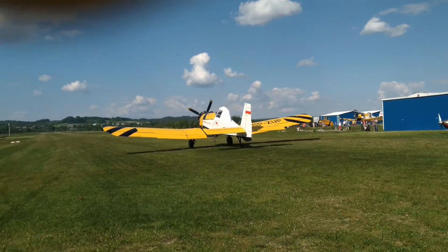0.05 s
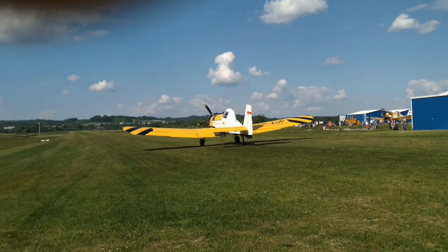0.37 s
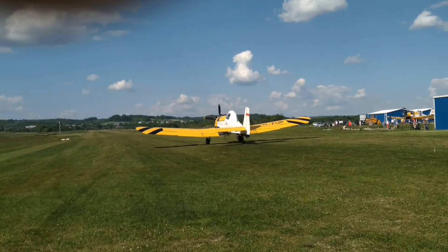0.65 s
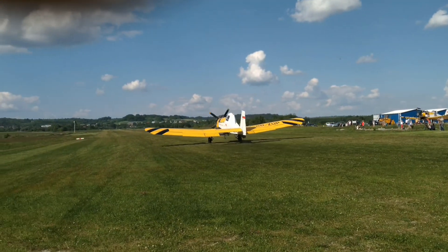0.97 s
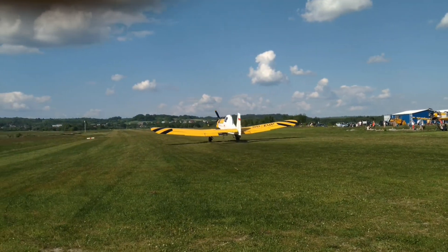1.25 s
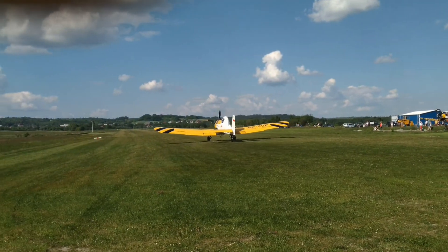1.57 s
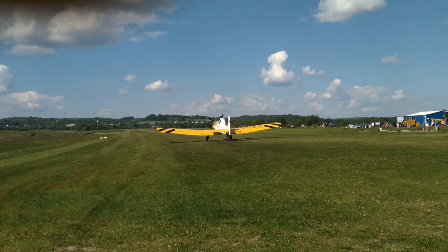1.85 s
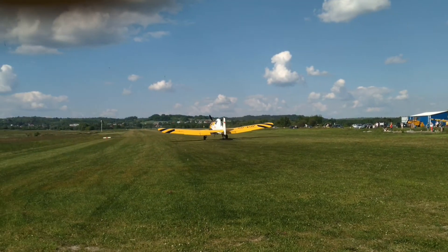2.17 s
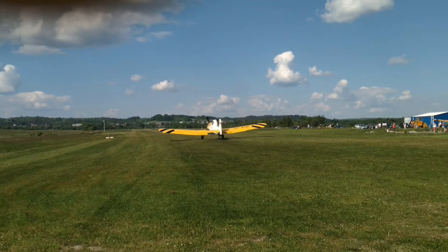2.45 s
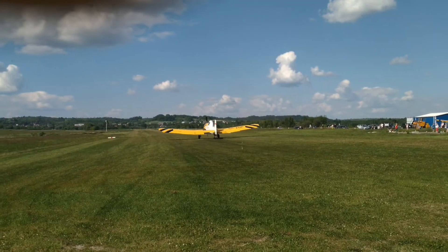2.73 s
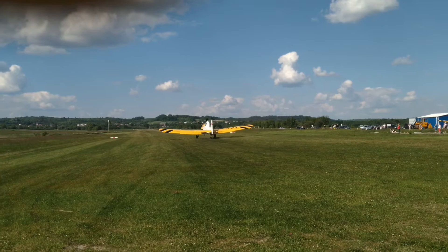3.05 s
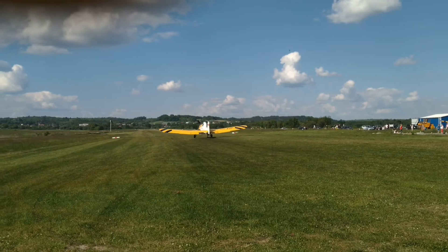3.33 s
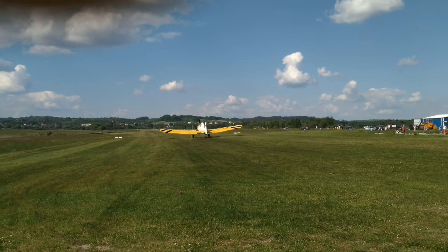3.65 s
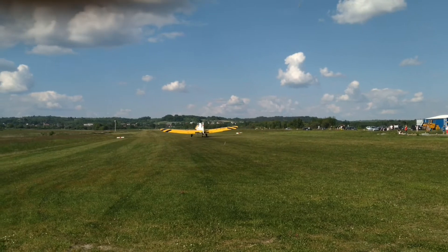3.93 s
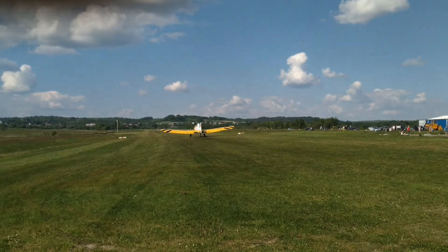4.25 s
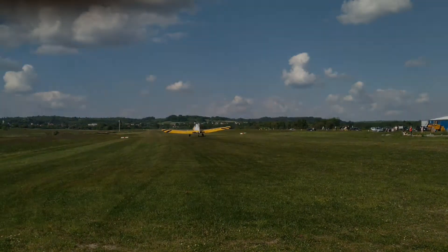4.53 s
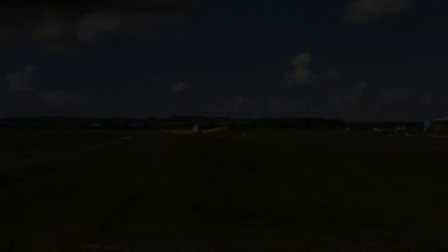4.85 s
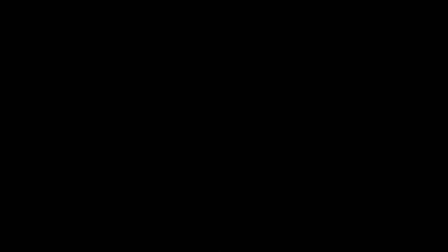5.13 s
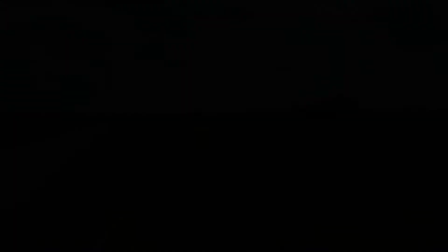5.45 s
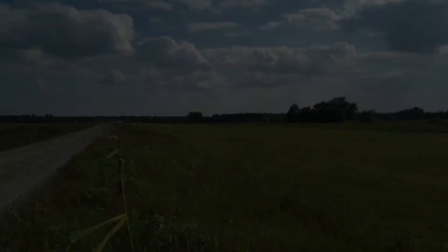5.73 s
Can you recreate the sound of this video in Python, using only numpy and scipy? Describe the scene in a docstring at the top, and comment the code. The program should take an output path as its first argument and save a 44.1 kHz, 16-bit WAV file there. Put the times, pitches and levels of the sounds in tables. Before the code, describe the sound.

A propeller plane taxis away across a grass airfield, its engine droning with an uneven, rasping throb while the blades hiss and roar in surges. As the hiss recedes, gusts of propeller wash rumble and thump on the stereo microphone. The sound cuts off with a small click, and a quieter, more distant engine idle fades in briefly.

```python
"""A grass airfield, with a stereo camera microphone 26 m behind a radial-engine plane that taxis away.
The propeller drones, unequal exhaust pulses throb and rasp, and air torn by the blades hisses and roars.
The propeller blows back at the camera: gusts buffet the two microphone ports and duck the gain.
The sound cuts off with the plane about 100 m out, and it fades in again, idling farther away."""
import sys
import numpy as np
from scipy import signal
from scipy.fft import rfft, irfft, next_fast_len
from scipy.io import wavfile
from scipy.ndimage import uniform_filter1d, minimum_filter1d, map_coordinates

SR = 44100
rng = np.random.default_rng(int(sys.argv[2]) if len(sys.argv) > 2 else 0)


def store_pcm(level_fs):
    """Save levels as 16-bit WAV."""
    pcm = np.round(np.clip(level_fs, -1, 1) * 32767).astype(np.int16)
    wavfile.write(sys.argv[1], SR, np.atleast_2d(pcm).T)


N = 255339
TIME = np.arange(N) / SR
START_M, ROLL_M_PER_S, ACCELERATION_M_PER_S2 = 26.4, 10.56, 1.14

# the engine's beat in the blade roar and the exhaust rasp: cycle_multiple, relative_db
ROAR_BEAT = [(2, 0), (4, -3), (14, -2)]


def propeller(turns):
    """Four geared blades pass 5.5 times an engine cycle and sound at twice that rate, with overtones."""
    # overtones: blade_rate_multiple, relative_db
    overtone_lines = [(4, 0), (6, -15.5), (8, -31.5)]
    # swells of the tone and of its overtones, distance aside: time_s, level_db
    tone_swell = [(0, -27), (.12, -13.5), (.3, -14), (.55, -24.5), (.75, -14.5), (1, -20.5), (1.35, -14.5),
                  (1.7, -20), (1.9, -17), (2.17, -32), (2.5, -14.5), (2.7, -18.5), (3.05, -33),
                  (3.3, -18.5), (3.65, -21), (4.3, -23), (4.6, -20.5), (5.24, -23)]
    overtone_swell = [(0, -24), (.12, -25.5), (.27, -21.5), (.4, -31), (.55, -19.5), (.9, -23), (1.1, -20),
                      (1.3, -28), (1.7, -19), (1.9, -19.5), (2.2, -19), (2.52, -27), (2.78, -23.5),
                      (3.1, -27.5), (3.4, -19.5), (3.7, -38), (4, -19), (5.24, -32)]
    blade_turns = turns * 5.5
    sway = 0.024 * drift(6)  # moving air advances and delays the tone
    tone = tones(blade_turns + sway, [(2, 0)], waver=0.1, waver_hz=5.19)
    overtones = tones(blade_turns + sway / 2, overtone_lines, waver=0.34, waver_hz=8)
    return fader(tone_swell) * tone + fader(overtone_swell) * overtones


def firing(turns):
    """Nine cylinders fire once a cycle each, heard at two and six times the firing rate."""
    # swell of the firing tone, distance aside: time_s, level_db
    firing_swell = [(0, -25), (.25, -23.5), (.38, -29.5), (.55, -16), (.8, -21.5), (1.03, -16.5),
                    (1.3, -18.5), (1.53, -22.5), (1.7, -17), (1.95, -17.5), (2.1, -15), (2.4, -17.5),
                    (2.7, -17), (3.3, -21.5), (5.24, -22)]
    return fader(firing_swell) * tones(turns * 9, [(2, 0.5), (6, -30.5)], waver=0.073, waver_hz=7.4)


def exhaust_throb(turns):
    """Unequal cylinders and pipes throb in lines; uneven combustion chugs between them."""
    # exhaust lines: cycle_multiple, relative_db
    exhaust_lines = [(6, -40), (8, -29.5), (10, -29.5), (12, -29.5), (14, -30), (15, -46.5), (20, -37.5),
                     (24, -30), (26, -44), (28, -35.5), (30, -42), (32, -37), (34, -46), (36, -48),
                     (40, -49), (44, -54), (46, -57), (56, -57.5)]
    # swells of the upper and of the deepest lines: time_s, gain_db
    upper_swell = [(0, 1), (.4, 0), (.8, 4.5), (1.13, -3.5), (1.45, 4), (1.65, 0), (1.95, 7), (2.3, 4.5),
                   (2.55, -4), (2.85, -5.5), (3.2, 2.5), (3.65, -9.5), (5.24, -18.5)]
    deep_swell = [(0, 3), (.55, 6.5), (.8, -5.5), (1.3, 6.5), (1.7, -7), (2.3, 0), (2.6, -0.5), (3, 5),
                  (3.5, 5), (5.24, -2.5)]
    # combustion noise: frequency_hz, density_db
    chug_colour = [(25, -26), (48, 2.5), (70, 7), (100, 7.5), (140, 0.5), (210, 3.5), (290, -3.5),
                   (370, -9.5), (600, -47.5), (1200, -72.5)]
    throb = tones(turns, exhaust_lines, waver=0.17, waver_hz=5.016)
    chug = coloured(rng.standard_normal(N) * (1 + 0.25 * throb), chug_colour)[0]
    upper = signal.sosfiltfilt(butter(3, 170, "high"), throb)
    deep = signal.sosfiltfilt(butter(4, 85, "low"), throb)
    throb = throb + (fader(upper_swell) - 1) * upper + (fader(deep_swell) - 1) * deep
    return receding(-23, doubling_db=0.22) * throb + receding(-29, doubling_db=0.5) * chug


def exhaust_rasp(turns):
    """Every crank turn repeats the same ragged exhaust bursts; moving air blends three such patterns."""
    # bark of the exhaust ports: frequency_hz, density_db
    rasp_colour = [(250, -26.5), (350, -2.5), (430, -5), (520, 4.5), (660, 1), (780, 4), (1050, -7),
                   (1500, -12.5), (2300, -34), (3200, -39.5)]
    crank_phase, grid = 2 * turns % 1, np.linspace(0, 1, 600)
    bursts = sum(drift(7) * np.interp(crank_phase, grid, rng.standard_normal(600)) for _ in range(3))
    bursts /= np.sqrt(abs(uniform_filter1d(bursts ** 2, size=5000)) + 1e-9)  # steady the level
    bursts *= 1 + 0.18 * tones(turns, ROAR_BEAT, waver=0.081, waver_hz=3.3)
    _, roar_db = surges()
    return receding(-44, doubling_db=3.5) * gain_of(1.17 * roar_db) * coloured(bursts, rasp_colour)[0]


def wash(turns):
    """Air torn by the blades hisses and roars in turbulent patches, pulsing with the engine."""
    # blade noise at the microphone: frequency_hz, left_db, right_db
    wash_colour = [(400, -11, -4.5), (513, 5.5, 2.5), (730, -6, -0.5), (1230, 7, 7.5), (1950, 5.5, 6),
                   (1960, 2, 1), (2283, 3.5, -1.5), (2730, -10.5, -13), (3720, -11, -10.5),
                   (5180, -23.5, -13.5), (6860, -31, -32), (7970, -40, -38.5), (9150, -40, -29),
                   (11600, -50, -36), (15500, -55, -54)]
    # the engine's beat in the whole wash: cycle_multiple, relative_db
    wash_beat = [(4, 0), (8, -8), (12, -6), (14, -10), (18, -6)]
    frames, hz = np.minimum(np.arange(N // 128 + 5) * 128, N - 1), np.fft.rfftfreq(512, 1 / SR)
    nearness = np.interp(TIME, [2.2, 3.3], [1, 0.4])
    spectra = port_noise(frames, hz)
    patches, flicker = rng.standard_normal((2, len(frames), len(hz)))
    patches = evened(uniform_filter1d(uniform_filter1d(patches, size=12, axis=0), size=5, axis=1))
    flicker = evened(uniform_filter1d(uniform_filter1d(flicker, size=3, axis=0), size=24, axis=1))
    turbulence_db = nearness[frames, None] * (2 * patches + 1.67 * flicker)
    top = 9.5 * (START_M / distance()) ** 4.8 - 0.5  # the top octave only carries from close by
    top_db = top[frames, None] * np.interp(hz, [5500, 11000, 15000], [0, 1, 2.6])
    spectra *= gain_of(spectrum(wash_colour, hz)[:, None] + swishes(frames, hz) + top_db + turbulence_db)
    high = 1 / (1 + (2800 / (hz + 1)) ** 8)  # hiss above the crossover, roar below
    bands = ((spectra * share).swapaxes(1, 2) for share in (high, 1 - high))
    hiss, roar = (evened(signal.istft(band, nperseg=512, noverlap=384)[1][:, :N]) for band in bands)
    wash_pulse = 0.16 * nearness * tones(turns, wash_beat, waver=0.37, waver_hz=3)
    roar_pulse = 0.08 * nearness * tones(turns, ROAR_BEAT, waver=0.37, waver_hz=3)
    hiss_db, roar_db = surges()
    hiss *= receding(-38, doubling_db=5.58) * gain_of(hiss_db)
    roar *= receding(-33, doubling_db=3.27) * gain_of(roar_db) * (1 + roar_pulse)
    return (hiss + roar) * (1 + wash_pulse)


def port_noise(frames, hz):
    """Noise spectra for the wash, which reaches the left port first; the two channels are only partly alike."""
    # how alike the two channels are: frequency_hz, likeness
    channel_likeness = [(100, .5), (500, 0.72), (1500, 0.85), (1950, 0.22), (2300, 0.82), (2800, 0.3),
                        (3300, 0.4), (4200, 0.28), (5300, 0.13), (5900, 1), (15000, 0.36)]
    # lead of the left port: frequency_hz, phase_rad
    left_lead = [(100, .15), (400, .8), (600, .6), (950, 2.1), (1400, 2.7), (2000, 4.7), (2450, 6.1),
                 (2900, 8.7), (3400, 11.3), (4000, 12.57)]
    draws = rng.standard_normal((4, len(frames), len(hz)))
    left, unrelated = draws[::2] + 1j * draws[1::2]
    likeness = spectrum(channel_likeness, hz)
    delayed = left * np.exp(-1j * spectrum(left_lead, hz))
    return np.array([left, likeness * delayed + np.sqrt(1 - likeness ** 2) * unrelated])


def swishes(frames, hz):
    """Peaks in the wash, in dB: a broad one wanders as the plane moves off, narrow ones come and go."""
    # broad peak: time_s, centre_hz, boost_db
    broad_peak = [(0, 560, 2.5), (.45, 510, 9.5), (.87, 920, 0.5), (1.05, 650, 10.5), (1.5, 776, 3),
                  (1.92, 1200, 4.5), (2.3, 740, 16), (2.65, 713, 4), (5.24, 608, 1.5)]
    # narrow peaks: middle_s, length_s, centre_hz, boost_db
    narrow_peaks = [(.09, 0.11, 550, 5.5), (0.098, 0.45, 1790, 3), (0.127, 0.055, 2340, 7.5),
                    (0.513, .12, 780, 8), (0.505, 0.047, 2320, 6.5), (0.894, .06, 890, 12.5),
                    (0.896, 0.04, 1880, 5), (1.197, 0.081, 2120, 0.5), (1.324, 0.17, 3660, 5.5),
                    (1.6, 0.093, 4130, 10.5), (1.762, 0.041, 3850, 11), (1.86, 0.35, 520, 5.5),
                    (1.94, .08, 2250, 2.5), (2.025, 0.24, 4340, 5.5), (3.4, 1.2, 7100, 5),
                    (2.307, 0.11, 2300, 3), (2.75, 0.39, 3970, 4), (2.628, 0.058, 2390, 7),
                    (2.73, 0.021, 2520, 9.5)]
    broad_hz, broad_db = curves(broad_peak)[:, frames, None]
    boost_db = broad_db * np.exp(-(np.log((hz + 1) / broad_hz) / 0.19) ** 2)
    for middle_s, length_s, centre_hz, db in narrow_peaks:
        peak = np.exp(-(np.log((hz + 1) / centre_hz) / 0.15) ** 2)
        boost_db += db * swell(middle_s, length_s)[frames, None] * peak
    return boost_db


def surges():
    """The propeller bites into rough air, adding dB to the hiss and to the roar."""
    # long swells and brief rips: middle_s, length_s, hiss_db, roar_db
    rough_air = [(0.038, 0.0097, -1, -2.5), (0.04, 0.3, 3, 5), (0.478, 0.0087, 2, 0.5),
                 (0.482, 0.17, 4.5, 6.5), (0.66, 0.15, 4.5, 3.5), (1.025, 0.38, 4, 3.5),
                 (1.033, 0.028, 5.5, 5), (1.089, 0.009, 9, 3), (1.36, 0.12, 1.5, 0.5),
                 (1.62, 0.43, 3.5, 0.5), (1.915, 0.12, 3, 6.5), (2.03, 0.087, 6, 1), (2.74, 0.46, 1.5, 1)]
    return sum(np.outer(boosts_db, swell(s, length_s)) for s, length_s, *boosts_db in rough_air)


def wind(eddies_per_s, eddy_widths_ms):
    """Each gust presses on the ports, rumbles, and sheds a flutter of eddies; a breeze rises beneath."""
    # gusts on the microphone: middle_s, length_s, pressure_db, flutter_db, left_minus_right_db
    gusts = [(2.66, 0.54, -27, -43, -15), (2.93, 0.31, -17.5, -36.5, 4), (3.801, 0.17, -11.5, -25.5, 4),
             (3.977, 0.21, -2, -14.5, 2), (4.087, 0.073, -8.5, -14, -6), (4.23, 0.29, -11, -29, -5),
             (4.455, 0.17, -3.5, -20.5, -3.5), (4.631, 0.24, -1.5, -19, -1.5), (4.929, 0.092, -7, -31, 14),
             (5.116, 0.24, -15.5, -47, 3)]
    # wind on a port: frequency_hz, density_db
    rumble_colour = [(15, -32.5), (30, -18.5), (50, 9), (90, 7.5), (170, 5), (300, -6.5), (420, -14),
                     (1000, -82)]
    pressure, stir, flutter = np.zeros(N), np.zeros((2, N)), np.zeros((2, N))
    for middle_s, length_s, pressure_db, flutter_db, pan_db in gusts:
        pressure += gain_of(pressure_db) * swell(middle_s, length_s)
        port_gains = gain_of([[flutter_db + pan_db / 2], [flutter_db - pan_db / 2]])
        stir += port_gains * swell(middle_s, 0.66 * length_s)  # eddies form only in the gust's core
    lumps = gain_of(2 * np.array([drift(15), drift(23)]))
    breeze = gain_of(-43 + 1.5 * TIME)
    strength = (breeze + gain_of(-5.5) * pressure) * gain_of([[3], [-3]])  # stronger on the left
    rumble = strength * lumps * coloured(rng.standard_normal((2, N)), rumble_colour)
    for width_ms in eddy_widths_ms:
        sizes = gain_of(3 * np.minimum(rng.exponential(1, (2, N)), 2)) * rng.choice([-1, 1], (2, N))
        train = sizes * (rng.random((2, N)) < eddies_per_s / SR)
        flutter += signal.oaconvolve(train, eddy(width_ms, np.pi / 2, order=2)[None], "same")
    return pressure + rumble + stir * evened(signal.sosfilt(butter(2, 340, "high"), flutter))


def buffets(gain_db, edge_hz):
    """Hard, tight eddies that each strike one port, which dulls their edge."""
    # the hardest eddies: middle_s, relative_db, width_ms, port (0 left, 1 right)
    strikes = [(2.6697, -9.5, 0.8, 1), (2.675, -9, 1.52, 1), (2.6837, -16.5, 0.63, 1),
               (2.76, -5.5, 1.04, 1), (2.765, -13, 0.64, 1), (2.776, -10.5, 0.78, 1), (2.8165, -13, 1.5, 1),
               (2.822, -15, 1, 1), (2.8452, -14, 1.2, 1), (2.8577, -13, 0.97, 1), (2.872, -12, 0.63, 1),
               (2.9127, -6.5, 0.65, 0), (2.9273, -18, 0.87, 0), (2.9852, -11, 1.5, 0),
               (3.0041, -17, 1.3, 0), (3.5296, -12.5, 1.8, 1), (3.7795, -3, 1.3, 1), (3.796, -2, 0.91, 0),
               (3.8096, -3, 2.2, 0), (3.8148, -5, 1.9, 1), (3.8245, -1, 1.6, 0), (3.9149, -2, 0.56, 0),
               (3.9216, -5.0, 0.58, 0), (3.9335, 4, 1.3, 0), (3.9406, 3, 1.6, 0), (3.9646, -1, 1.05, 1),
               (3.9675, 6, 0.52, 0), (3.9736, 4, 0.74, 0), (3.9825, 3, 0.7, 0), (3.9868, 0.5, 0.52, 1),
               (3.9912, -2, 0.52, 1), (3.9994, 7.5, 1.7, 0), (4.0298, 3.5, 1.36, 0), (4.0494, 5, 0.97, 0),
               (4.0616, -9, 0.53, 0), (4.0747, -2, 0.59, 1), (4.0805, 6, 1.07, 1), (4.0908, 7.5, 0.43, 0),
               (4.1062, -0.5, 1.1, 0), (4.129, -9, 0.53, 0), (4.1875, -4.5, 1.7, 1),
               (4.2109, -4.0, 0.76, 0), (4.2282, -7, 1.8, 1), (4.26, -4.5, 1.1, 1), (4.2933, -6.5, 1.7, 0),
               (4.3412, -7.5, 0.49, 0), (4.359, -8, 0.74, 0), (4.3942, 0.5, 0.86, 1), (4.4084, -1, 0.65, 1),
               (4.4518, 6.5, 0.9, 0), (4.4551, 3.5, 0.45, 0), (4.4606, 4.5, 1.8, 0), (4.4659, 3.5, 0.64, 0),
               (4.483, -2, 0.56, 1), (4.5661, 0.5, 1, 1), (4.607, 7.5, 0.51, 1), (4.6263, 12, 1.85, 1),
               (4.6312, 2, 0.57, 1), (4.641, -1, 1.09, 0), (4.6806, -6, 0.66, 0), (4.746, -7.5, 1.3, 1),
               (4.9301, 2, 1.2, 0)]
    out = np.zeros((2, N))
    for middle_s, db, width_ms, port in strikes:
        hit = gain_of(db + gain_db) * eddy(width_ms, 2 * np.pi * rng.random(), order=3)
        start = round(middle_s * SR) - len(hit) // 2
        out[port, start:start + len(hit)] += hit
    return signal.sosfiltfilt(butter(2, edge_hz, "low"), out)


def eddy(width_ms, angle, order):
    """Pressure of a vortex crossing a port: a sharp kink that swings back, more so at higher order."""
    ms = np.arange(-500, 500) / SR * 1000
    return (np.exp(1j * angle) / (1 + 1j * ms / width_ms) ** order).real * np.hanning(len(ms))


def far_idle(crank_hz):
    """From afar: an uneven beat at every crank turn, a rumble, and dull air noise that pulses along."""
    # idle lines: crank_multiple, relative_db
    idle_lines = [(2, -46), (3, -31), (4, -28), (5, -36), (6, -32), (7, -35.5), (8, -46), (9, -32),
                  (10, -57.5), (11, -53), (14, -59), (28, -55), (30, -54), (31, -58)]
    # air noise: frequency_hz, density_db
    air_colour = [(150, -7.5), (250, -20.5), (513, -19.5), (589, -13), (664, -21), (774, -21.5),
                  (1210, -20.5), (1290, -27), (1730, -23.5), (6150, -53), (15000, -55)]
    crank_angle = 2 * np.pi * crank_hz * (TIME - 5.591)
    # each beat is a pulse that the pipes ring on after, which sets the lag of every line
    multiples = abs(np.fft.fftfreq(128, 1 / 128))
    pipes_db = np.interp(multiples, *np.transpose(idle_lines), left=-70, right=-70)
    lag = signal.hilbert(np.log(gain_of(pipes_db))).imag
    hum = evened(sum(gain_of(db) * (1 + 0.2 * drift(12))
                     * np.cos(k * crank_angle - lag[k] + 0.3 * drift(7)) for k, db in idle_lines))
    rumble_colour = [(30, -26), (55, -3.5), (90, 12), (180, 18), (260, -34), (600, -74)]
    rumble = coloured(rng.standard_normal(N), rumble_colour)[0]
    air = coloured(rng.standard_normal(N) + rng.standard_normal((2, N)), air_colour)
    air *= np.interp(TIME, [5.39, 5.5], [0.5, 1]) * (1 + 0.13 * hum)
    return gain_of(-23.5) * hum + gain_of(-32) * rumble + gain_of(-40) * air


def ticks():
    """Tiny clicks that die at once."""
    # a click as the sound cuts off, then faint ticks over the idle: start_s, level_db
    clicks = [(5.24, -22.5), (5.452, -41), (5.512, -44), (5.612, -34.5)]
    steps = np.zeros(N)
    for start_s, level_db in clicks:
        steps[round(start_s * SR)] = gain_of(level_db)
    return signal.lfilter([1], [1, -np.exp(-2 * np.pi * 1500 / SR)], steps)


def microphone_hiss(level_db):
    """The microphone's own noise, separate in each channel."""
    # self-noise: frequency_hz, density_db
    hiss_colour = [(1000, -1.5), (12800, 5), (14500, -9)]
    return gain_of(level_db) * coloured(rng.standard_normal((2, N)), hiss_colour)


def ducked(x, threshold_db, ratio, recover_db_per_s):
    """The camera's gain control backs off under the pressure of a gust; then the deepest bass is shed."""
    power_db = 10 * np.log10(abs(uniform_filter1d((x ** 2).mean(0), size=900)) + 1e-12)
    recovery_db = recover_db_per_s * TIME
    held_db = np.maximum.accumulate(power_db + recovery_db) - recovery_db
    over_db = uniform_filter1d(np.maximum(held_db - threshold_db, 0), size=600)
    return signal.sosfilt(butter(3, 33, "high"), x / gain_of((1 - 1 / ratio) * over_db))


def ports(x, lag_ms, left_db):
    """The sound reaches the left microphone port first."""
    return np.array([x * gain_of(left_db), np.interp(TIME - lag_ms * 1e-3, TIME, x)])


def distance():
    """Metres from the microphone to the plane, which rolls away gathering speed."""
    return START_M + ROLL_M_PER_S * TIME + ACCELERATION_M_PER_S2 * TIME ** 2 / 2


def receding(start_db, doubling_db):
    """Gain of a layer that loses doubling_db with each doubling of distance."""
    return gain_of(start_db - doubling_db * np.log2(distance() / START_M))


def tones(turns, lines, waver, waver_hz):
    """Lines locked to a shaft, to rms 1; each wavers in strength and phase through moving air."""
    out = np.zeros(N)
    for multiple, db in lines:
        angle = 2 * np.pi * (multiple * turns + rng.random()) + waver * drift(waver_hz)
        out += gain_of(db) * (1 + waver * drift(waver_hz)) * np.cos(angle)
    return evened(out)


def drift(rate_hz):
    """Smooth random wander of rms 1."""
    knots, coarse = rng.standard_normal(256), TIME[::128]
    return np.interp(TIME, coarse, evened(map_coordinates(knots, [coarse * rate_hz + 2], mode="wrap")))


def swell(middle_s, length_s):
    """A smooth rise and fall, 1 at its middle."""
    return np.exp(-(2 * (TIME - middle_s) / length_s) ** 2)


def curves(rows):
    """One curve over time for each column after the first."""
    time_s, *columns = np.transpose(rows)
    return np.array([np.interp(TIME, time_s, column) for column in columns])


def fader(rows):
    """Gain over time from rows of time_s, level_db."""
    return gain_of(curves(rows)[0])


def spectrum(points, hz):
    """A spectrum table read on a log-frequency axis, one row for each column after the first."""
    table_hz, *columns = np.transpose(points)
    return np.array([np.interp(np.log(hz + 1), np.log(table_hz), column) for column in columns])


def coloured(x, points):
    """Filters by a spectrum table, to rms 1."""
    size = next_fast_len(N)
    response = gain_of(spectrum(points, np.fft.rfftfreq(size, 1 / SR)))
    return evened(irfft(rfft(x, size) * response, size)[..., :N])


def butter(order, corner_hz, kind):
    """Sections of a low-pass or high-pass filter."""
    return signal.butter(order, corner_hz, kind, fs=SR, output="sos")


def gain_of(db):
    """Decibels to amplitude."""
    return 10 ** (np.asarray(db) / 20)


def evened(x):
    """Scales to rms 1."""
    return x / np.sqrt(np.mean(abs(x) ** 2) + 1e-20)


def scene():
    """The departing plane in the wind, a cut, then the distant idle."""
    # engine speed, two crank turns to a cycle: time_s, cycle_rate_hz
    engine_speed = [(0, 8.99), (.6, 8.98), (1.4, 8.92), (2, 8.89), (2.9, 8.78), (3.5, 8.73), (3.9, 8.67),
                    (5.24, 8.66)]
    # fade-in of the idle: time_s, gain_db
    fade_in = [(5.39, -34), (5.42, -10), (5.46, -10.5), (5.52, -6.5), (5.6, -4.5), (5.68, -2.5),
               (5.79, -3.5)]
    cut_s, resume_s = 5.24, 5.392
    turns = np.cumsum(curves(engine_speed)[0] * (1 + 0.001 * drift(12))) / SR  # counts engine cycles
    drone = receding(0, doubling_db=5.16) * (propeller(turns) + firing(turns))
    departure = ports(drone, lag_ms=0.21, left_db=0.3)
    departure += ports(exhaust_throb(turns), lag_ms=0.22, left_db=0.1)
    departure += ports(exhaust_rasp(turns), lag_ms=0.22, left_db=1.5)
    departure += wash(turns)
    departure += wind(eddies_per_s=260, eddy_widths_ms=(0.65, 1.3)) + buffets(gain_db=0.6, edge_hz=6600)
    departure += microphone_hiss(level_db=-67)
    departure = ducked(departure, threshold_db=-14.5, ratio=3.67, recover_db_per_s=89)
    idle = far_idle(crank_hz=20.3) * fader(fade_in)
    return departure * (TIME < cut_s) + idle * (TIME > resume_s) + ticks()


def record(dry):
    """A peak limiter, then a band limit at 15.7 kHz."""
    allowed_gain = np.minimum(1, 0.72 / (abs(dry).max(0) + 1e-9))
    limited = dry * uniform_filter1d(minimum_filter1d(allowed_gain, size=401), size=401)
    band_limit = signal.firwin(511, 15700, window=("kaiser", 9), fs=SR)
    return signal.oaconvolve(limited, band_limit[None], "same")


dry = scene()
out = record(dry)
store_pcm(out)
```